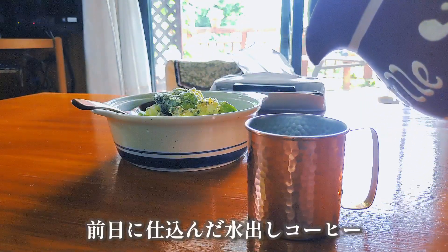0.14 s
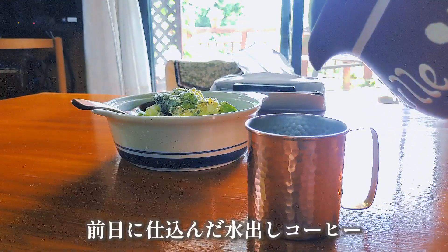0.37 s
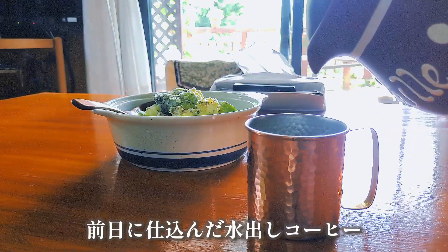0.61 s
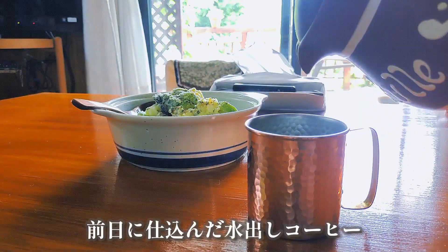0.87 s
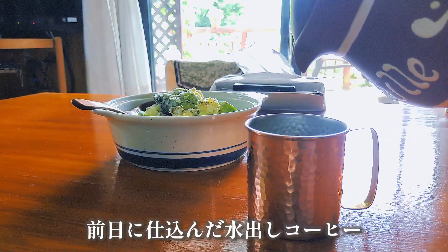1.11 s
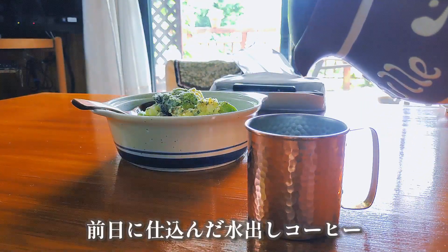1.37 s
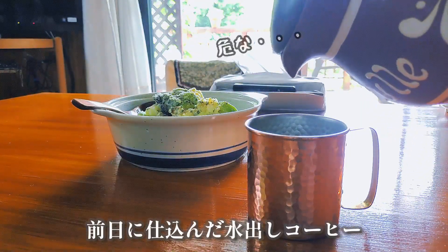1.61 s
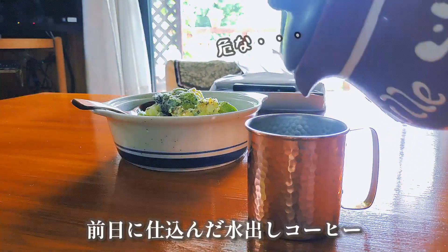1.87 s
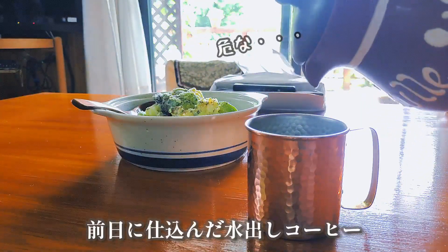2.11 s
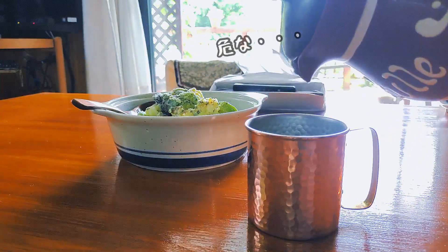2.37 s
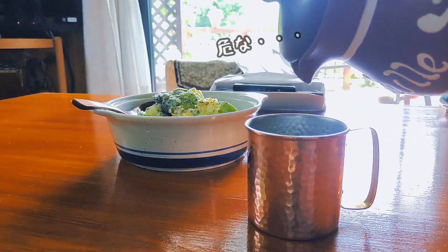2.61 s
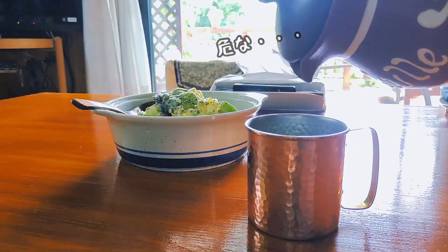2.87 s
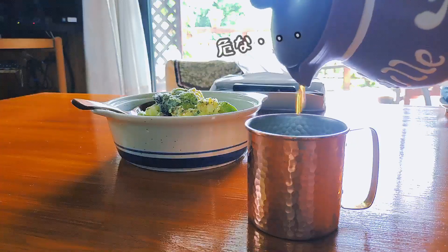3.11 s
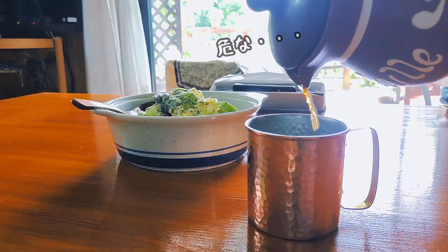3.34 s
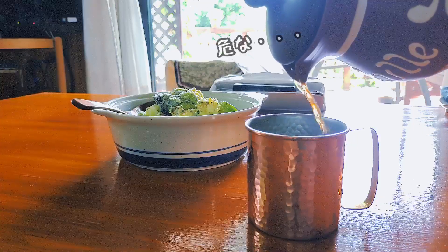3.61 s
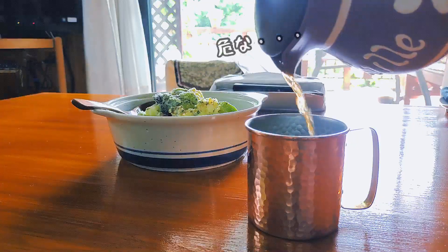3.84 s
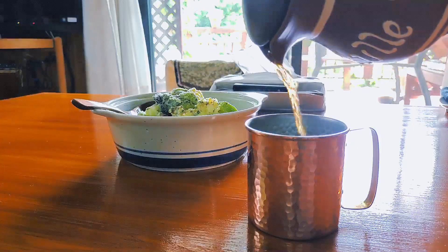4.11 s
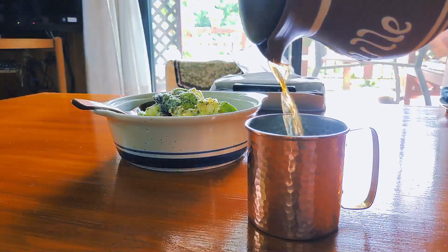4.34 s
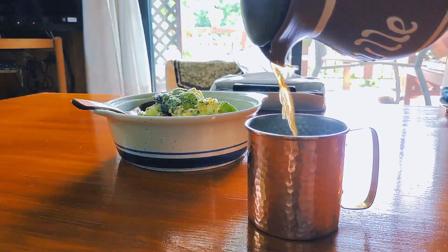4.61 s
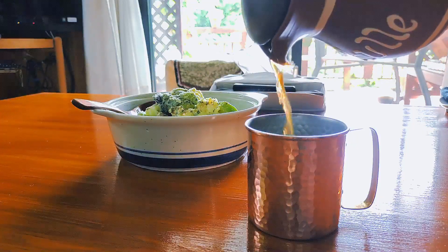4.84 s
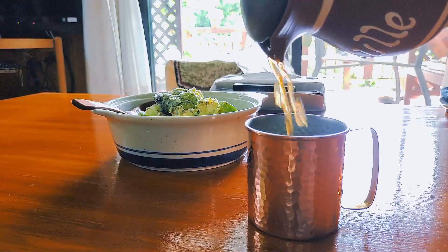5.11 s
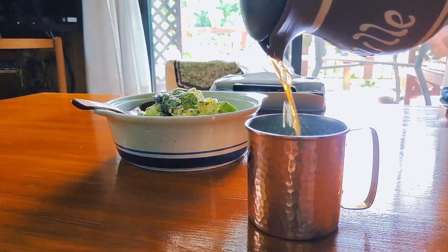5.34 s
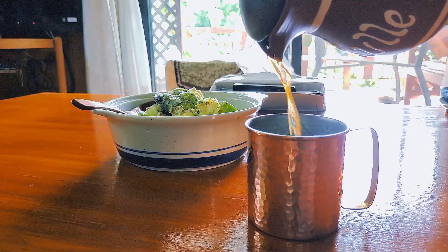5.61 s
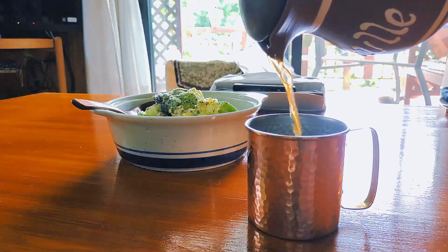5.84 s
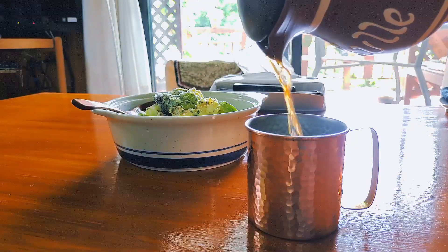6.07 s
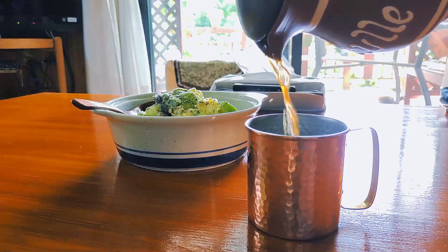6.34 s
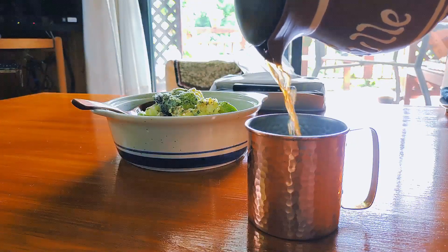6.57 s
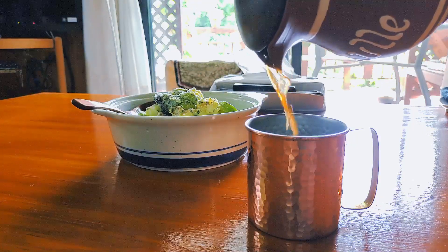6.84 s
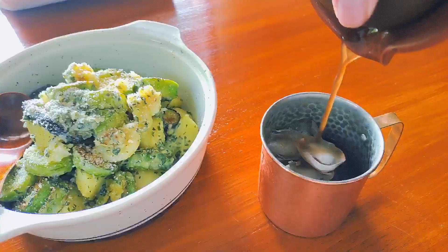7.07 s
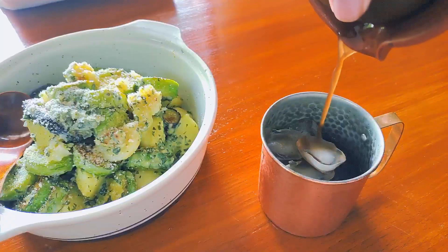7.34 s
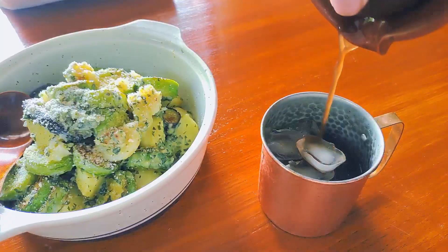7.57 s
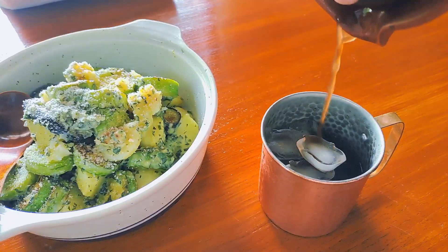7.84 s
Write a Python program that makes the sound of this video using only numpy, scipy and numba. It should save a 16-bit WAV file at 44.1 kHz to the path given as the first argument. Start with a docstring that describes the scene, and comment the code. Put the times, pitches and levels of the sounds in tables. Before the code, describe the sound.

Close at a table in a small, slightly live room, insects shimmer steadily outside and a clock ticks faintly. A hollow ceramic clack comes first, later a tiny spout hiss and fine droplets. The pour thickens, knocking ice against the thin metal wall, whose ring sinks as the mug fills. A tiny dropout, then duller bubbling plops without clinks.

```python
"""Cicadas through an open door, mains hum, room rumble and a ticking wall clock: then a drink is poured.
A jug's lid clacks as ceramic resonances; fine spray and a hissing spout announce the drink. Gulps, ice and stream
drive the ringing modes of a copper mug, whose wall rings sink as it fills, under a splash of bubbles.
After a cut, a dropout of a few milliseconds, the nearly full mug only gurgles: bubble tones and dull wall knocks."""
import sys
import numpy as np
from scipy import signal
from scipy.fft import rfft, irfft, next_fast_len
from scipy.io import wavfile
from scipy.ndimage import uniform_filter1d, map_coordinates
from numba import njit

SR = 44100
rng = np.random.default_rng(int(sys.argv[2]) if len(sys.argv) > 2 else 0)


def gain_from_decibels(decibels):
    """Convert decibel values to linear amplitude factors."""
    exponent = np.asarray(decibels, float) / 20
    return 10 ** exponent


def generate_wav(sig):
    """Save sig (samples, or channels by samples) to the path in sys.argv[1] as 16-bit PCM at SR."""
    pcm = np.round(np.clip(np.atleast_2d(sig).T, -1, 1) * 32767).astype(np.int16)
    wavfile.write(sys.argv[1], SR, pcm)


N = 350595
T = np.arange(N) / SR


def unit(x):
    """Scale to rms 1."""
    return x / np.sqrt(np.mean(x ** 2) + 1e-20)


def along(points, hz):
    """Read (frequency [Hz], value) points on a log frequency axis."""
    f, v = np.transpose(points)
    return np.interp(np.log(hz + 1), np.log(f + 1), v)


def curves(rows, **ends):
    """One value per sample for each column after the time."""
    s, *columns = np.transpose(rows)
    return [np.interp(T, s, column, **ends) for column in columns]


def wobble(rate):
    """A smooth random curve, rate knots a second."""
    knots = rng.standard_normal(int(N * rate / SR) + 4)
    return map_coordinates(knots, [T * rate])


def noise(gain):
    """Noise of rms 1 coloured by a gain over frequency."""
    m = next_fast_len(N)
    spectrum = rfft(rng.standard_normal(m)) * gain(np.fft.rfftfreq(m, 1 / SR))
    return unit(irfft(spectrum, m)[:N])


def shaped(spectrum):
    """Noise of rms 1 with a (frequency [Hz], level [dB]) spectrum."""
    return noise(lambda hz: gain_from_decibels(along(spectrum, hz)))


def train(times, sizes):
    """Impulses of given sizes."""
    at = (np.asarray(times) * SR).astype(int)
    return np.bincount(np.clip(at, 0, N - 1), sizes, N)


def soft(x, size):
    """A contact lasts a little while: impulses become short pushes."""
    return np.convolve(x, np.hanning(size + 2) * 2 / (size + 1))[:N]


def fade(x, t60):
    """Every impulse becomes an exponential decay."""
    return signal.lfilter([1], [1, -gain_from_decibels(-60 / (abs(t60) * SR))], x)


@njit
def recur(drive, pole):
    """One-pole memory with a pole for each sample."""
    out = drive.copy()
    for k in range(1, len(out)):
        out[k] += pole[k] * out[k - 1]
    return out


def mode(drive, hz, t60):
    """A resonance whose pitch and decay may move: a unit impulse rings as a unit sine."""
    pole = gain_from_decibels(-60 / (np.abs(t60) * SR)) * np.exp(2j * np.pi * hz / SR) * np.ones(N)
    return recur(drive + 0j, pole).imag


def grains(times, hz, sizes, t60, rise, size=2048):
    """Damped sines whose pitch climbs as they die, the term rise setting how far."""
    t = np.arange(size)[None] / SR
    life = t / t60[:, None]
    phase = 2 * np.pi * hz[:, None] * t * (1 + rise * np.minimum(life, 1))
    onset = 1 - np.exp(-t / 0.00036)
    wave = np.sin(phase) * gain_from_decibels(-60 * life) * onset
    at = (times * SR).astype(int)[:, None] + np.arange(size)
    return np.bincount(at.ravel(), (sizes[:, None] * wave).ravel(), N + size)[:N]


def crowd(start, count):
    """Random times from start to the end, with three more uniform draws each."""
    when, *rest = rng.random((count, 4)).T
    return start + when * (N / SR - start), *rest


# room rumble: (frequency [Hz], relative level [dB per Hz])
RUMBLE = [(5.9, -30.5), (10, 5), (24, -0.5), (44, -13.5), (105, -16.5), (124, -28), (142, -18),
          (223, -23.5), (248, -27), (371, -28), (402, -13.5), (525, -29.5), (724, -34.5), (897, -43.5),
          (6000, -44), (7800, -73.5), (13200, -120)]
RUMBLE_DB = -48
# mains hum: (frequency [Hz], amplitude [dB])
HUM_LINES = [(102.3, -70.5), (150.7, -64.5), (247.6, -69)]


def background():
    """Room rumble as shaped noise, mains hum as gently wavering sines."""
    hum = sum(gain_from_decibels(db + 0.84 * wobble(4.4)) * np.sin(2 * np.pi * hz * T) for hz, db in HUM_LINES)
    return gain_from_decibels(RUMBLE_DB) * shaped(RUMBLE) + hum


# smooth band of the far chorus: (frequency [Hz], relative level [dB per Hz])
CICADA_BAND = [(3240, -49), (5500, -12.5), (5700, -23), (6110, -14), (6500, -10), (7140, -6.5), (7860, 3),
               (9510, -14.5), (10700, -25.5), (14800, -31.5), (15800, -33)]
# the nearer singers: (frequency [Hz], full width 18 dB down [Hz], relative level [dB])
NEAR_SINGERS = [(6800, 130, -3.5), (7290, 34, 3), (7800, 17, -2.5), (8400, 60, 1), (8640, 19, -2),
                (9050, 28, -7)]
# swell of all the cicadas: (time [s], level of the far band [dB])
CHORUS_LEVEL = [(0.0, -59), (2.57, -60), (6.0, -58.5), (7.1, -62.5), (7.95, -57)]


def singer(centre_hz, width_hz):
    """One insect's song: noise narrowed to a resonant line."""
    return noise(lambda hz: 1 / (1 + ((hz - centre_hz) / (0.19 * width_hz)) ** 2))


def cicadas():
    """A far chorus as a smooth band, nearer singers as narrow wavering lines."""
    near = sum(gain_from_decibels(db + 2.5 * wobble(5)) * singer(hz, width) for hz, width, db in NEAR_SINGERS)
    far = gain_from_decibels(wobble(18)) * shaped(CICADA_BAND)
    return gain_from_decibels(curves(CHORUS_LEVEL)[0]) * (far + gain_from_decibels(-5.0) * unit(near))


# colour of the clock case: (frequency [Hz], relative level [dB])
CLOCK_COLOUR = [(700, -2), (1080, 0.5), (1250, -5), (1380, -3), (1900, -9), (2400, -12), (4000, -17)]
FIRST_TICK_S, TICK_GAP_S, TICK_DB = 0.026, 1.005, -58.5


def clock():
    """About once a second a soft scraping tick: a noise burst and a fainter one behind it."""
    s = FIRST_TICK_S + TICK_GAP_S * np.arange(7)
    size = gain_from_decibels(TICK_DB + rng.standard_normal(len(s)))
    contacts = train(s, size) + train(s + 0.036, size * gain_from_decibels(-20.0))
    swell = uniform_filter1d(fade(contacts, 0.36), size=500, origin=249)  # softens the onset
    return swell * shaped([(500, -62)] + CLOCK_COLOUR + [(6000, -55)])


# lid contacts, relative levels: (time [s], ring [dB], thud [dB], knock [dB], crack [dB])
LID_CONTACTS = [(1.506, -44, -24, -57, -48), (1.517, -8, -7.5, -25, -27.5), (1.5332, -14, -20, -44, -47),
                (1.54, 8.5, -10, -37, -46), (1.549, -27, -15.5, -43.5, -44), (1.556, -28, -16, -55, -39),
                (3.238, -39.5, -55, -37, -57), (3.285, -50.5, -72.5, -54, -56), (3.466, -72, -37, -51, -79)]
# ring of jug and lid: (frequency [Hz], relative level [dB], t60 [s])
CERAMIC_MODES = [(1850, -25, 0.028), (2129, -18, 0.024), (2271, -5, 0.042), (2340, -6, 0.02),
                 (2540, -11.5, 0.035), (3060, -34.5, 0.028), (4064, -35.5, 0.031), (4770, -26.5, 0.075),
                 (5020, -33.5, .08), (5410, -36, .09), (5870, -41.5, .08), (5960, -38.5, 0.12),
                 (7110, -28.5, .05), (9570, -36.5, .03), (11400, -40.5, .03)]
# the jug's hollow belly: (frequency [Hz], relative level [dB], t60 [s])
BELLY_MODES = [(272, -12.5, 0.072), (328.6, 0.5, .1), (370, -3, 0.11), (502, -5.5, 0.082),
               (637, -7.5, 0.031)]
# the jug's neck: (frequency [Hz], relative level [dB], t60 [s])
NECK_MODES = [(800, -4, .05), (950, 4.5, 0.036), (1150, -0.5, 0.036), (1400, -2.5, .05), (1650, -9.5, .04)]


def jug():
    """The lid rattles on the rim: ceramic ring, hollow belly and neck, and a crack."""
    s, ring_db, thud_db, knock_db, crack_db = np.transpose(LID_CONTACTS)
    blows = train(s, gain_from_decibels(ring_db))
    # subtracting a fast decay lets the ring build up in a millisecond
    ring = sum(gain_from_decibels(db) * (mode(blows, hz, t60) - mode(blows, hz, 0.0038)) for hz, db, t60 in CERAMIC_MODES)
    thud = sum(mode(soft(train(s, gain_from_decibels(thud_db - 10.5 + db)), size=40), hz, t60)
               for hz, db, t60 in BELLY_MODES)
    knock = sum(mode(soft(train(s, gain_from_decibels(knock_db - 7.5 + db)), size=12), hz, t60)
                for hz, db, t60 in NECK_MODES)
    colour = shaped([(700, -34), (1500, -3.0), (6000, -3.5), (8000, -10.0), (15500, -30.0)])
    crack = fade(train(s, gain_from_decibels(crack_db)), 0.088) * colour
    no_bass = signal.butter(4, 210, "high", fs=SR, output="sos")  # too small to radiate bass
    return signal.sosfilt(no_bass, ring + thud + knock + crack)


# the finest mist: (time [s], level [dB])
MIST = [(3.3, -78.5), (3.8, -75.5), (4.37, -66), (4.83, -67), (5.32, -63), (6.76, -64.5), (7.03, -81),
        (7.24, -65), (7.35, -67.5), (7.95, -66)]
# the larger droplets bursting: (time [s], strength [dB], pitch [Hz])
BIG_DROPLETS = [(3.3831, -45, 8940), (3.442, -46.5, 10760), (3.677, -51, 9100), (3.8503, -39.5, 9700),
                (3.9778, -41, 13700), (4.267, -40.5, 9450), (4.3704, -40.5, 12100), (4.4113, -36, 10700),
                (4.4737, -36, 9700), (4.7291, -41, 9500), (4.8355, -31, 8600), (4.9346, -28.5, 9170),
                (5.0592, -31, 9300), (5.2313, -27, 11200), (5.2954, -43, 9000), (5.3552, -28, 8960),
                (5.3768, -29, 9800), (5.3917, -28, 8900), (5.418, -32, 9100), (5.5407, -30, 8830),
                (5.5881, -28, 9700), (5.729, -35, 9920), (5.7642, -28, 8850), (5.83, -26, 8800),
                (5.9543, -38, 8770), (5.9791, -26, 9000), (6.0384, -39, 8700), (6.1701, -35, 9800),
                (6.2636, -33, 13500), (6.289, -31, 8700), (6.3722, -35, 11900), (6.4873, -38, 9500),
                (6.6045, -32, 8950), (6.637, -31, 9300), (6.8069, -33, 8800), (6.8321, -27, 8800),
                (6.8894, -37, 9100), (7.1196, -36.5, 11900), (7.1895, -40, 8700), (7.4253, -42, 8800),
                (7.5946, -33, 8500), (7.7084, -38, 8460), (7.7842, -33.5, 8350), (7.8722, -33.5, 8500),
                (7.93, -34, 11900)]


def spray():
    """Droplets burst as tiny bright ticks over a flickering mist."""
    mist_db, = curves(MIST, left=-120)
    s, pitch, size, _ = crowd(3.8, count=95)
    small_db = mist_db[(s * SR).astype(int)] + 21.5 + 18 * (size - 0.5)  # lesser droplets follow the mist
    small = zip(s, small_db, 8700 * 1.5 ** pitch ** 3)
    s, db, hz = np.transpose(BIG_DROPLETS + list(small))
    bright = [(6000, -31), (8500, 6.0), (11000, -5), (15800, -8.0)]
    tones = grains(s, hz, gain_from_decibels(db + 2), np.full(len(s), .006), rise=0.012, size=512)
    spits = fade(train(s, gain_from_decibels(db - 11.5)), 0.015) * shaped(bright)
    times, _, size, _ = crowd(2.7, count=900)
    mist = fade(train(times, gain_from_decibels(-3 * np.log(size))), 0.014) * shaped(bright)
    return tones + spits + gain_from_decibels(mist_db) * unit(mist)


# air in the spout: (time [s], pitch [Hz], level [dB])
SPOUT_AIR = [(3.44, 3600, -80.5), (3.55, 3950, -74), (3.63, 4150, -71.5), (3.7, 4120, -78),
             (3.76, 4150, -89)]


def spout():
    """Air hisses in the spout, as noise through a gliding resonance, while the drink starts to run."""
    hz, db = curves(SPOUT_AIR, left=-120, right=-120)
    hz = np.abs(hz)
    hiss = mode(mode(rng.standard_normal(N), hz, 0.0035), hz, 0.0035)
    return gain_from_decibels(db) * unit(hiss) * gain_from_decibels(2 * wobble(40))


# the falling stream, relative levels: (time [s], wall drive [dB], splash [dB])
STREAM_FLOW = [(3.75, -70.5, -77), (3.9, -68.5, -65), (4.3, -54.5, -57), (5.17, -49, -44),
               (5.7, -49, -42.5), (6.0, -42.5, -38.5), (6.45, -44, -33), (6.9, -39.5, -38),
               (7.06, -41, -29.5)]
# the sound is cut here and drops out for a few milliseconds: (start [s], end [s])
CUT = (7.062, 7.07)


def lesser_blows(level_db, count):
    """Random blows of the pour before the cut, growing: time, strength in dB, uniform draw for pitch."""
    when, size, pitch = rng.random((count, 3)).T
    start = STREAM_FLOW[1][0]
    s = start + when * (CUT[0] - start)
    growth_db = 2.5 * (s - s.mean())
    return s, level_db + growth_db + 18 * (size - 0.5), pitch


# the stronger gulps thumping the wall: (time [s], strength [dB], centre [Hz])
STRONG_GULPS = [(3.9, -51, 2130), (3.93, -46, 2130), (3.952, -39, 2050), (4.055, -29.5, 2205),
                (4.124, -38, 2200), (4.149, -32.5, 2184), (4.238, -39.5, 2160), (4.356, -36.5, 2040),
                (4.412, -15, 2093), (4.459, -28, 2060), (4.622, -28, 1070), (4.729, -32, 834),
                (4.933, -21.5, 903), (5.056, -24, 938), (5.132, -29.5, 1150), (5.233, -26.5, 950),
                (5.323, -31.5, 822), (5.392, -19.5, 1805), (5.455, -31, 1720), (5.597, -26, 1800),
                (5.738, -24, 1750), (5.826, -21.5, 1760), (5.907, -20.5, 2340), (5.982, -26, 1700),
                (6.035, -33, 1023), (6.056, -17, 1743), (6.247, -14.5, 952), (6.309, -22.5, 950),
                (6.353, -29, 954), (6.401, -16, 1702), (6.47, -32, 895), (6.513, -17, 980),
                (6.516, -16, 1484), (6.54, -22, 1560), (6.623, -16, 891), (6.812, -17, 1700),
                (6.844, -24.5, 895), (6.903, -30, 930), (6.967, -26, 810), (7.0, -19, 1670),
                (7.002, -22, 862), (7.045, -29.5, 920)]
# the stronger ice clinks: (time [s], strength [dB], centre [Hz], treble relative to strength [dB])
STRONG_CLINKS = [(3.7, -41.5, 4400, -24.5), (3.8493, -39.5, 7800, 3.5), (3.953, -41, 3240, -11.5),
                 (4.0554, -42, 3210, -19), (4.1735, -38.5, 8500, -6), (4.3551, -42.5, 3100, -10.5),
                 (4.4086, -28.5, 3220, -15), (4.4603, -28.5, 4210, -17), (4.73, -11.5, 3820, -25),
                 (4.8626, -28.5, 8270, -11), (4.9366, -19, 4110, -12), (4.9826, -31, 7900, -21),
                 (5.058, -28.5, 9100, -6), (5.232, -29.5, 3630, -9), (5.2871, -22.5, 5540, -10.5),
                 (5.3733, -29.5, 6750, -4.5), (5.3926, -19, 3620, -17), (5.4545, -24.5, 6700, -15),
                 (5.494, -27, 3780, -16), (5.5423, -20, 4680, -19), (5.5987, -14.5, 2855, -29),
                 (5.6799, -25.5, 4340, -32), (5.7264, -27, 4250, -18), (5.7549, -19, 6040, -17),
                 (5.8099, -19.5, 6900, -14), (5.8348, -13.5, 4430, -32), (5.9538, -20.5, 6830, -12),
                 (5.9802, -24, 3660, -6.5), (6.0364, -25, 4200, -7), (6.0714, -23.5, 3720, -14),
                 (6.1312, -17.5, 4180, -38), (6.162, -22.5, 4050, -31), (6.2513, -26, 2870, -14),
                 (6.2861, -25, 5920, -9), (6.3086, -24, 2400, -21.5), (6.3514, -17.5, 3850, -14),
                 (6.407, -25.5, 3170, -22), (6.4593, -22.5, 8020, -16), (6.4877, -26, 3590, -7.5),
                 (6.595, -20, 4230, -13), (6.6075, -19, 3970, -17), (6.6637, -23, 3920, -16),
                 (6.7103, -22, 2820, -15), (6.7688, -17.5, 4145, -22), (6.8325, -23, 2860, -12),
                 (6.8894, -24.5, 9400, -14.5), (6.9033, -22.5, 5540, -17), (6.9498, -27, 6800, -9),
                 (7.0451, -24.5, 4010, -27)]
# wall modes loaded by the rising drink: (time [s], first [Hz], second [Hz], third [Hz])
SINKING_MODES = [(3.801, 1191, 2200, 3250), (4.3, 1217, 2112, 3060), (4.45, 1226, 2035, 2960),
                 (4.9, 1150, 1830, 2844), (5.4, 1096, 1768, 2830), (5.9, 1010, 1734, 2610),
                 (6.3, 960, 1662, 2790), (7.1, 889, 1682, 2750)]
# rim, handle and base modes that keep their pitch: (frequency [Hz], relative level [dB], t60 when empty [s])
COPPER_MODES = [(574, -28, 0.033), (888, 4, 0.036), (1492, -13.5, 0.052), (2400, -28, 0.024),
                (2570, -21.5, 0.074), (3364, -15.5, 0.05), (3600, -4, 0.11), (3860, -3.5, 0.07),
                (4217, -5.5, 0.32), (4570, -3.5, 0.094), (5085, -11.5, 0.22), (5852, -4, 0.11),
                (6840, -6.5, 0.13), (7620, -15, .1), (8850, -6, 0.088), (9580, -9, 0.073)]


def blows_on_mug():
    """All gulps and clinks; small gulps favour the base or one wall mode, small clinks any high pitch."""
    s, db, pitch = lesser_blows(-43.5, count=80)
    first, second, third = (hz[(s * SR).astype(int)] for hz in curves(SINKING_MODES))
    centre_hz = np.choose((pitch * 4).astype(int), [first, second, third, COPPER_MODES[1][0]])
    gulps = STRONG_GULPS + list(zip(s, db, centre_hz))
    s, db, pitch = lesser_blows(-42, count=70)
    clinks = STRONG_CLINKS + list(zip(s, db, 2500 * 3.6 ** pitch, np.full(len(s), -12.5)))
    return gulps, clinks


# the three sinking modes, one row each: (relative level [dB], t60 when empty [s])
WALL_MODES = [(0, 0.17), (0.998, 0.09), (3, 0.055)]
# how full the mug is: (time [s], share of the wall under the drink [0-1])
FILL_LEVEL = [(3.8, 0.08), (4.9, 0.22), (5.4, 0.56), (7.1, 0.79)]
# crack of the ice: (frequency [Hz], relative level [dB])
ICE_CRACK = [(2000, -8), (2600, 3.5), (6500, 2.5), (8000, -34)]
# treble of the crack: (frequency [Hz], relative level [dB])
ICE_TREBLE = [(5500, -26), (7000, 3), (10000, -4.5), (15800, -33)]


def mug():
    """Gulps, ice and stream drive the same copper modes; the rising drink damps and detunes them."""
    gulps, clinks = blows_on_mug()
    s, strength_db, centre_hz = np.transpose(gulps + [row[:3] for row in clinks])
    drive_db, _ = curves(STREAM_FLOW, left=-120, right=-120)
    fill, = curves(FILL_LEVEL)
    # the stream arrives in lumps
    lumps = gain_from_decibels((6.5 + 3.7 * fill) * np.tanh(wobble(35)) + 4.23 * wobble(250))
    at = (s * SR).astype(int)
    ring = np.zeros(N)
    # the stream strikes the wall itself; the other modes are sheltered by 4 dB
    wall = [(hz, db, t60, 0) for hz, (db, t60) in zip(curves(SINKING_MODES), WALL_MODES)]
    for hz, db, t60, sheltered_db in wall + [(*row, -4) for row in COPPER_MODES]:
        hz = hz * np.ones(N)
        # a blow favours the modes near its own pitch
        reach_db = np.maximum(-90 * np.log(hz[at] / centre_hz) ** 2, -11 - 8 * fill[at])
        blows = soft(train(s, gain_from_decibels(strength_db + reach_db - 14)), size=4)
        log_pitch = np.log(hz / 1000)
        flow_db = drive_db + sheltered_db - 34.5 - 3.9 * log_pitch
        flow = gain_from_decibels(flow_db) * lumps * rng.standard_normal(N)
        t60_share = np.clip(1 - fill * (0.32 + 0.39 * log_pitch), .15, 1)
        ring += gain_from_decibels(db) * mode(blows + flow, hz + (4 + 4 * fill) * wobble(60), t60 * t60_share)
    # trapped air and ice ring briefly
    own = grains(s, centre_hz, gain_from_decibels(strength_db - 10.5), 45 / centre_hz + 0.027, rise=0.011)
    s, strength_db, _, treble_db = np.transpose(clinks)
    crack = fade(train(s, gain_from_decibels(strength_db - 14)), 0.023) * shaped(ICE_CRACK)
    treble = fade(train(s, gain_from_decibels(strength_db + treble_db - 3)), 0.023) * shaped(ICE_TREBLE)
    return ring + own + crack + treble


# colour of the splash: (frequency [Hz], relative level [dB per Hz])
SPLASH_COLOUR = [(590, -21), (1000, 30), (1070, -11.5), (1300, -15), (1720, -12), (4330, -13.5),
                 (15800, -17)]


def splash():
    """A dense crowd of small bubbles in clumps over a patchy hiss, following the flow."""
    times, pitch, size, life = crowd(2.9, count=6000)
    hz = 1400 * 7.5 ** pitch
    sizes = gain_from_decibels(along(SPLASH_COLOUR, hz) * 1.15 - 2 * np.log(size))
    fizz = unit(grains(times, hz, sizes, (3 + 12 * life) / hz, rise=0.025, size=640))
    clumps = unit(gain_from_decibels(6.4 * wobble(40) + 3.3 * wobble(150)))
    level = gain_from_decibels(curves(STREAM_FLOW, left=-120, right=-120)[1]) * clumps
    return level * (gain_from_decibels(-13.5) * fizz + gain_from_decibels(-12.5) * shaped(SPLASH_COLOUR))


# the trickle after the cut: (time [s], relative burble level [dB], central bubble pitch [Hz])
TRICKLE_FLOW = [(7.075, -61, 2560), (7.16, -61, 4460), (7.263, -45.5, 4657), (7.38, -52.5, 3900),
                (7.42, -54, 2640), (7.63, -47.5, 2400), (7.67, -53.5, 1650), (7.95, -55.5, 1820)]


def trickle():
    """In the full mug short bubbles burble around a pitch set by the hollow the stream digs."""
    level_db, centre_hz = curves(TRICKLE_FLOW, left=-120)
    times, pitch, size, life = crowd(CUT[1], count=900)
    hz = centre_hz[(times * SR).astype(int)].clip(600) * 3.2 ** (pitch - .5)
    burble = grains(times, hz, gain_from_decibels(-3 * np.log(size)), (10 + 25 * life) / hz, rise=0.057, size=1024)
    return gain_from_decibels(level_db - 3.0) * burble


# the larger bubbles in the full mug: (time [s], strength [dB], pitch [Hz])
BIG_BUBBLES = [(7.1098, -48.5, 2600), (7.2045, -37.5, 5140), (7.216, -28, 4180), (7.245, -22.5, 5010),
               (7.292, -34.5, 4600), (7.31, -32.5, 4500), (7.3444, -24.5, 4220), (7.358, -31.5, 4050),
               (7.4373, -23.5, 2320), (7.459, -25.5, 2980), (7.4742, -23, 2830), (7.5148, -20.5, 2170),
               (7.537, -26, 1600), (7.5587, -15.5, 2540), (7.628, -34, 1280), (7.663, -30, 1320),
               (7.71, -32, 1340), (7.726, -39, 2750), (7.7506, -22, 1604), (7.756, -25.5, 4500),
               (7.7922, -32, 1550), (7.8239, -28.5, 4500), (7.84, -22, 2850), (7.841, -24.5, 1500),
               (7.897, -32, 4500), (7.931, -25.5, 1520)]
# damped modes of the nearly full mug: (frequency [Hz], relative level [dB], t60 [s])
FULL_MUG_MODES = [(1520, -4, .015), (2750, -5.5, 0.015), (4500, -4, 0.016)]


def plops():
    """Rising bubble tones, each with a spit of noise and a smaller follower; the full mug answers dully."""
    s, db, hz = np.transpose(BIG_BUBBLES)
    late, shift, life = rng.random((len(s), 3)).T
    t60 = 0.014 * (0.71 + 0.52 * life)
    tones = grains(s, hz, gain_from_decibels(db - 4.0), t60, rise=0.017, size=1024)
    follow_s = np.minimum(s + 0.0028 + 0.004 * late, 7.94)
    followers = grains(follow_s, hz * (0.83 + 0.25 * shift), gain_from_decibels(db - 15), t60, rise=0.11, size=1024)
    spit = fade(train(s, gain_from_decibels(db - 19)), .01) * shaped([(800, -24), (1500, -1), (5000, 12), (8000, -15.0)])
    flow = gain_from_decibels(curves(TRICKLE_FLOW, left=-120)[0] + 6.3 * wobble(110)) * rng.standard_normal(N)
    knocks = soft(train(s, gain_from_decibels(db - 25)), size=3) + gain_from_decibels(-34.5) * flow
    wall = sum(gain_from_decibels(level) * mode(knocks * gain_from_decibels(4.8 * wobble(30)), f, ring) for f, level, ring in FULL_MUG_MODES)
    return tones + followers + spit + wall


# decay of the room: (frequency [Hz], t60 [s])
ROOM_DECAY = [(200, 0.4), (2000, .3), (6000, 0.42), (12000, 0.26)]


def room(x):
    """Diffuse answer of the room, each frequency dying at its own speed."""
    hz, t, z = signal.stft(rng.standard_normal(SR // 2), SR, nperseg=256)
    decay = gain_from_decibels(-60 * t / along(ROOM_DECAY, hz)[:, None])
    tail = signal.istft(z * decay, SR, nperseg=256)[1]
    delayed = np.pad(x, (200, 0))
    return signal.fftconvolve(delayed, tail / np.linalg.norm(tail))[:N]


def scene():
    """Table sounds in the room over the steady background, all muted for the short dropout at the cut."""
    steady = background() + cicadas() + clock()
    lid = jug()
    drops = spray() + spout() + trickle() + plops()
    pour = mug() + splash()
    before_cut = lid + pour + gain_from_decibels(-15.5) * room(lid) + gain_from_decibels(-8.5) * room(pour)
    before_cut = before_cut * (T < CUT[1])  # the cut chops off its tails
    echo = gain_from_decibels(-19) * room(drops)
    sounding = np.clip(np.maximum(CUT[0] - T, T - CUT[1]) / 0.0021, 0, 1)
    return (sounding * (before_cut + drops + echo + steady))[None]


def top_cut(x):
    """Nothing passes above the cut-off."""
    return signal.sosfilt(signal.butter(12, 15980, fs=SR, output="sos"), x)


def record(dry):
    """The input clips at full scale."""
    mix = np.clip(dry, -1, 1)
    return top_cut(mix)


dry = scene()
out = record(dry)
generate_wav(out)
```